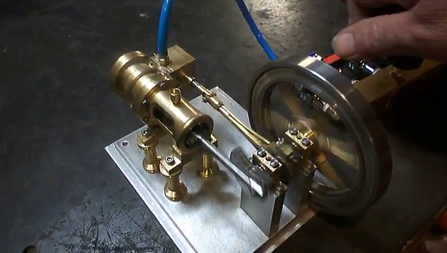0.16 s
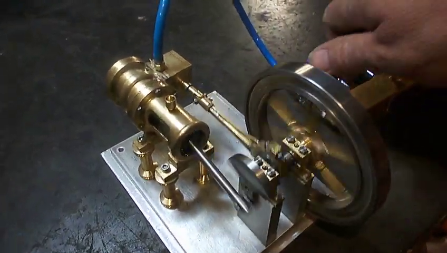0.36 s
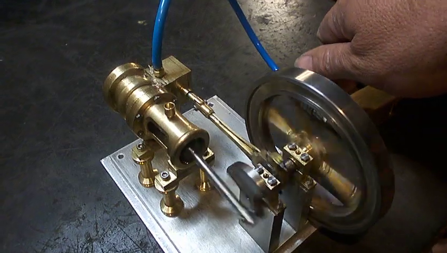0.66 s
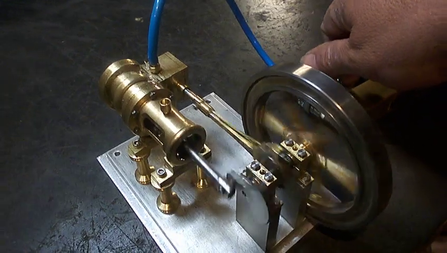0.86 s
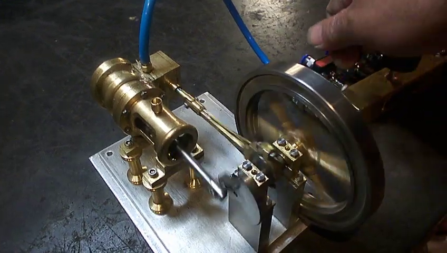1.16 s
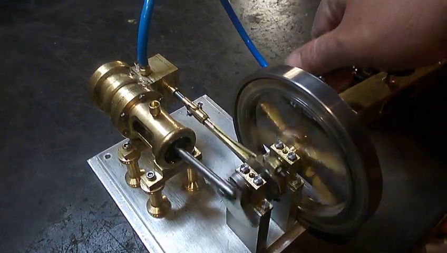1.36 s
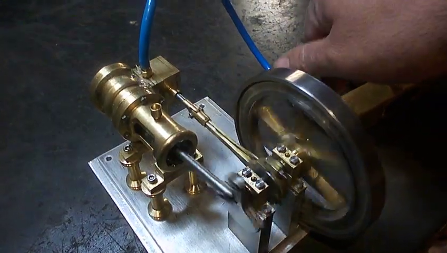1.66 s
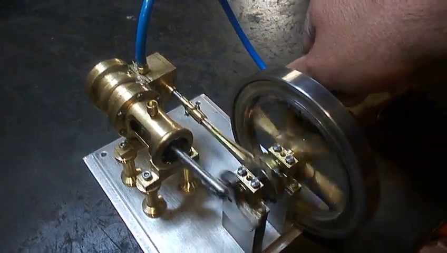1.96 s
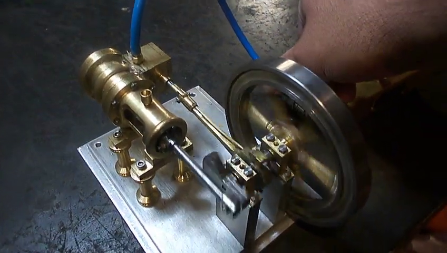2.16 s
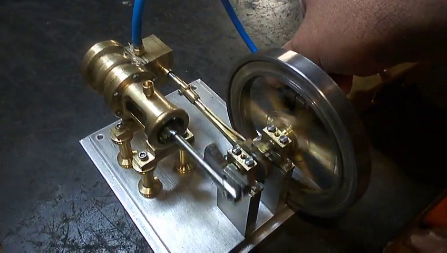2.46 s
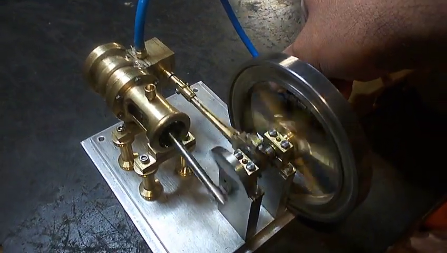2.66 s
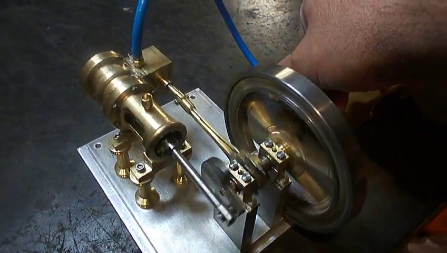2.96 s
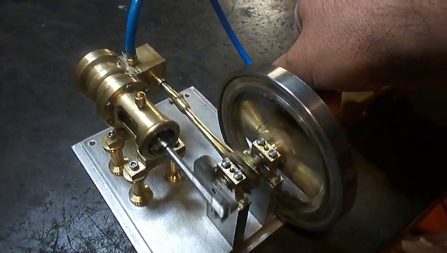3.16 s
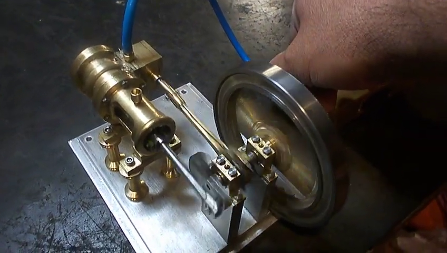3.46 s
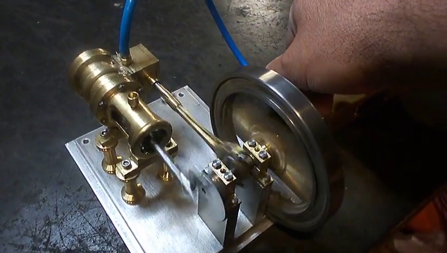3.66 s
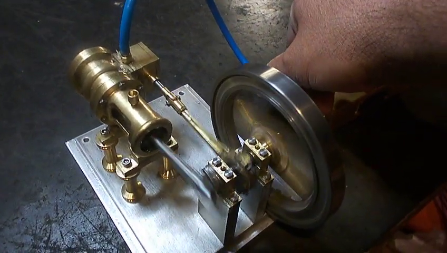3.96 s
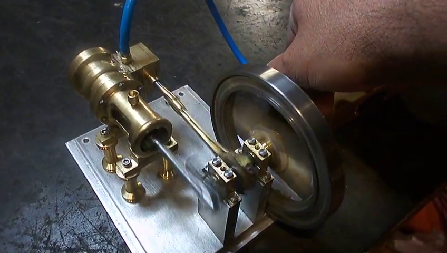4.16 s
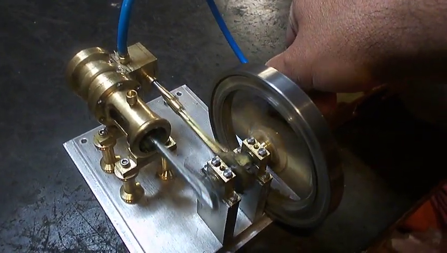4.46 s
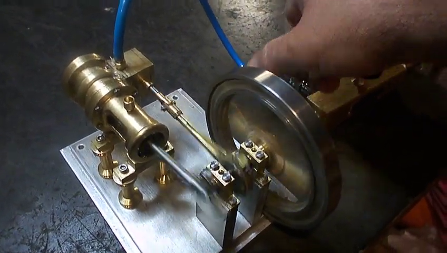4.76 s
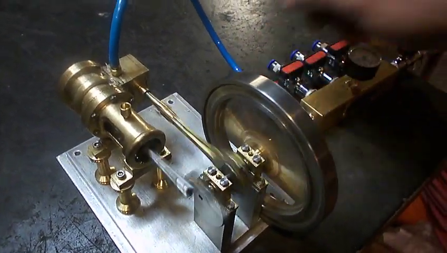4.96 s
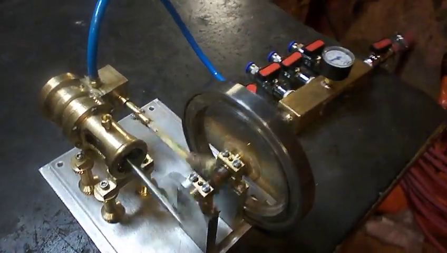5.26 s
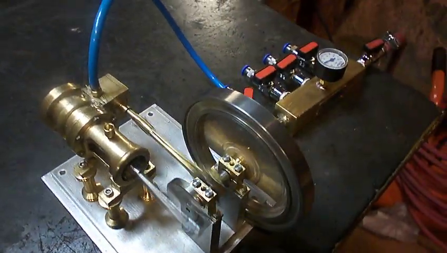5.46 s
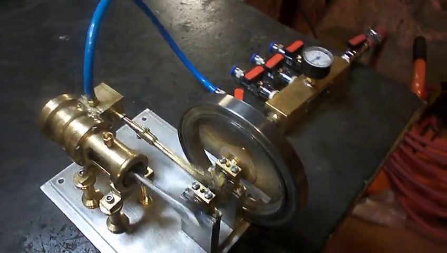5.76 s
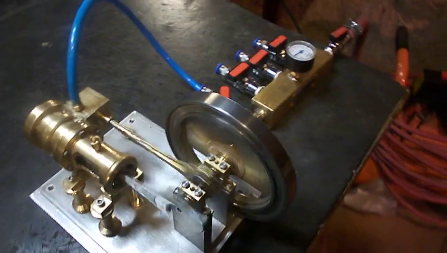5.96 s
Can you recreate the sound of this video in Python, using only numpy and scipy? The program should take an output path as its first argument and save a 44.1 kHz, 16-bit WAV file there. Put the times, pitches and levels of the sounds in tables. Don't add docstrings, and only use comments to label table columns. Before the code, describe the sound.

A small brass engine on a workshop bench, heard close and dry through a modest camera microphone with dull top end. From 0 s a bright, turbulent air leak hisses continuously, strongest in the upper mids. Over it come soft-edged exhaust puffs, two per turn, about seven a second, each slightly different, some whistling, with a faint hollow port ring. Until about 2.6 s a hand adds quiet, fuzzy, low gliding rubs on hose and tap. Around 2.8 to 3 s the hose gives a brief low moan as flow increases. The engine accelerates; the last distinct puffs fade by 3.6 s. From 3.5 s the hiss flutters with each turn, and a soft rod knock raps the plate once per turn, eight then ten a second. A low rattling shudder swells, settling after 5.4 s at about eleven turns a second, running steadily to the end.

```python
import sys
import numpy as np
from scipy import signal
from scipy.fft import rfft, irfft
from scipy.io import wavfile
from scipy.ndimage import uniform_filter1d

SR = 44100
rng = np.random.default_rng(int(sys.argv[2]) if len(sys.argv) > 2 else 0)


def invert_db(level):
    return 10 ** (np.asarray(level, dtype=float) / 20)


def log_audio(samples):
    frames = np.atleast_2d(samples).T
    limited = np.clip(frames, -1, 1)
    pcm = np.round(limited * 32767).astype(np.int16)
    wavfile.write(sys.argv[1], SR, pcm)


N = 269892
TIME = np.arange(N) / SR
IDLE, FULL = 3.4, 11.1


def evened(x):
    return x / np.sqrt(np.mean(x ** 2) + 1e-20)


def read(points, hz):
    f, value = np.transpose(points)
    return np.interp(np.log(hz + 1), np.log(f + 1), value)


def colour(x, points):
    return irfft(rfft(x) * invert_db(read(points, np.fft.rfftfreq(N, 1 / SR))), N)


def bell(hz, centre_hz, spread_hz):
    return np.exp(-.5 * ((hz - centre_hz) / spread_hz) ** 2)


def resonate(x, hz, width_hz):
    turn = np.exp(2j * np.pi * np.cumsum(hz * np.ones(len(x))) / SR)
    pole = np.exp(-np.pi * width_hz / SR)
    return 2 * (turn * signal.lfilter([1 - pole], [1, -pole], x / turn)).real


def resonate_twice(x, hz, width_hz):
    return resonate(resonate(x, hz, width_hz), hz, width_hz)


def ringing(air, modes):
    return sum((-1) ** k * invert_db(db) * evened(resonate_twice(air, hz, 1.3 * width_hz))
               for k, (hz, width_hz, db) in enumerate(modes))


def speed(t):
    # (time [s], speed [turns per s])
    speed_points = [(0, 3.473), (1.4, 3.512), (1.8, 3.383), (2.35, 3.367), (2.6, 3.9), (3.05, 4.893),
                    (3.5, 7.581), (3.85, 9.431), (4.5, 10.407), (5.4, 11.125), (6.2, 11.14)]
    return np.interp(t, *np.transpose(speed_points))


def crank(t):
    start_turn = .564
    steps_s = np.arange(7000) / 1000
    turns = start_turn + np.cumsum(speed(steps_s - .0005)) / 1000 - speed(0) / 1000
    return np.interp(t, steps_s, turns)


def from_angle(turns, angle):
    return (turns - angle + .5) % 1 - .5


def near(turns, angle, spread):
    return np.exp(-.5 * (from_angle(turns, angle) / spread) ** 2)


def leak(patchy_db=1.1, flicker_db=0.63):
    # (time [s], level [dB])
    pressure = [(0, -26.5), (.04, -28.5), (.12, -26), (.8, -26), (1.5, -27.5), (2.1, -27.5), (2.6, -26.5),
                (2.9, -25.5), (3.6, -25), (4.2, -26.5), (5.2, -26), (5.6, -27), (6.05, -25.5), (6.12, -27)]
    # (idling [dB], picking up [dB], full speed [dB])
    tilt_gains = [(0.76, 1.7, -1.7), (1.75, -2.8, -0.5), (-.6, -2, -3.5)]
    # (centre [Hz], spread [Hz])
    tilt_bands = [(4700, 500), (2000, 1200), (0, 300)]
    # crank angle [0-1], spread [turns], level [dB]
    shut_valve = (0.72, 0.068, -0.94)
    # (crank angle [0-1], spread [turns], centre [Hz], spread [Hz], level [dB])
    valve = [(0.3, 0.065, 5300, 360, 4.5), (.76, 0.055, 4650, 280, -6.5), (0.2, 0.18, 6100, 330, -3.5),
             (0.85, 0.081, 6500, 410, 3.5), (.76, 0.043, 7200, 800, -1.5), (0, 0.033, 3600, 280, 0),
             (.25, .03, 1400, 280, 4.5), (0.5, 0.088, 1900, 530, 1), (0, 0.029, 350, 150, 3),
             (0.8, 0.029, 1700, 360, -4), (.5, 0.064, 500, 210, 3), (0.6, 0.055, 160, 170, 0),
             (.14, 0.027, 210, 230, -4.5), (1, 0.093, 99, 110, -2)]
    # (frequency [Hz], density [dB per Hz])
    leak_colour = [(35, -59.5), (60, -43.5), (100, -29.5), (140, -8.5), (300, -12), (600, -14), (1100, -13),
                   (1700, -12.5), (2300, -7), (3350, -6), (4250, -0.5), (5500, 0), (7000, 0), (9000, -24)]
    # (centre [Hz], spread [Hz], level [dB])
    body = [(530, 29, 3.5), (733, 37, 2), (1076, 55, 3), (1300, 22, -1.5), (1704, 70, -3), (2400, 44, 2),
            (3040, 65, 2), (3720, 110, -0.5), (4466, 70, -3.5), (4470, 110, 2), (4970, 110, -2.5),
            (4975, 57, 3), (5680, 60, 1), (6610, 110, -1), (6690, 130, 1.5)]
    pick_up = 4.85

    frames, hz = N // 128 + 5, np.fft.rfftfreq(512, 1 / SR)[:, None]
    t = np.arange(frames) * 128 / SR
    real, imag, patches = rng.standard_normal((frames, 257, 3)).T
    patches = uniform_filter1d(patches, size=6, axis=0)
    patches = evened(uniform_filter1d(patches, size=10, axis=1))
    flicker = evened(uniform_filter1d(rng.standard_normal(frames), size=3))

    level_db = np.interp(t, *np.transpose(pressure))
    running = np.interp(speed(t), [IDLE, pick_up], [0, 1])
    angle, spread, shut_db = shut_valve
    field_db = level_db + patchy_db * patches + flicker_db * flicker
    field_db += (1 - running) * shut_db * near(crank(t), angle, spread)
    for gains_db, band in zip(tilt_gains, tilt_bands):
        field_db += np.interp(speed(t), [IDLE, pick_up, FULL], gains_db) * bell(hz, *band)
    for angle, spread, centre_hz, spread_hz, db in valve:
        field_db += running * db * near(crank(t), angle, spread) * bell(hz, centre_hz, spread_hz)

    hiss = signal.istft((real + 1j * imag) * invert_db(field_db), nperseg=512, noverlap=384)[1][:N]
    hiss = colour(hiss, leak_colour)
    hz = np.fft.rfftfreq(N, 1 / SR)
    tint_db = sum(db * bell(hz, centre_hz, spread_hz) for centre_hz, spread_hz, db in body)
    return evened(irfft(rfft(hiss) * invert_db(tint_db), N)) * np.sqrt(np.mean(invert_db(level_db) ** 2))


def exhaust(song_db=-4.5, song_width_hz=550):
    # (time [s], jet level [dB], jet song [Hz])
    puffs = [(.125, -33, 5830), (.246, -30.5, 5530), (.41, -33, 4700), (.559, -33.5, 4780),
             (.695, -30.5, 4780), (.839, -36, 4610), (.978, -33, 6300), (1.119, -32.5, 6800),
             (1.266, -27.5, 6260), (1.404, -29.5, 4900), (1.561, -31.5, 6650), (1.691, -27, 4510),
             (1.852, -27, 4670), (1.986, -25.5, 4700), (2.143, -28, 5600), (2.265, -29, 5530),
             (2.435, -29, 6380), (2.582, -30, 4760), (2.684, -25.5, 6600), (2.785, -37.5, 4740),
             (3.055, -29.5, 4970), (3.128, -30.5, 4650), (3.193, -29.5, 4620), (3.298, -34, 5000),
             (3.556, -30.5, 5660)]
    puff_turns = (0.14, .1)
    port_db = (-37.5, -40.5)
    # (frequency [Hz], width [Hz], level [dB])
    port = [(732, 50, -9.5), (1065, 116, -4), (1434, 66, -10), (2316, 63, -7.5), (3050, 150, -1.5)]
    # (frequency [Hz], density [dB per Hz])
    jet_colour = [(80, -60.5), (300, -32), (1500, -20), (2500, -0.5), (3700, -5), (4700, 3), (6400, 6.5),
                  (7000, 2), (8000, -4.5)]
    # (frequency [Hz], width [Hz], level [dB])
    nozzle = [(2194, 230, -24), (4710, 290, -9), (5260, 64, -20.5), (6730, 390, -9.5)]
    port_loss_db, fade_turns_per_s = -9.5, 0.73

    ring, jet = np.zeros((2, N))
    for s, jet_db, _ in puffs:
        back = round(2 * crank(s)) % 2
        length_s = puff_turns[back] / speed(s)
        faded = np.clip((speed(s) - IDLE) / fade_turns_per_s, 0, 1) ** 2
        ring_db = port_db[back] + port_loss_db * faded
        now = abs(TIME - s) < 6 * length_s
        late = (TIME[now] - s) / (length_s * np.where(TIME[now] < s, .7, 1.2))
        ring[now] += invert_db(ring_db) * np.exp(-1.2 * late ** 2)
        jet[now] += invert_db(jet_db) * np.exp(-.5 * late ** 2)

    air = rng.standard_normal((4, N))
    s, _, jet_hz = np.transpose(puffs)
    nearest = np.interp(TIME, s, np.arange(len(puffs))).round().astype(int)
    song = invert_db(song_db) * evened(resonate_twice(air[3], jet_hz[nearest], song_width_hz))
    jet_air = evened(colour(air[1], jet_colour)) + ringing(air[2], nozzle) + song
    return ring * ringing(air[0], port) + jet * jet_air


def knock(uneven_db=-0.5):
    # (speed [turns per s], blow [dB])
    blow_db = [(5, -61.5), (8, -37.5), (10.2, -39.5), (11.1, -46)]
    # (frequency [Hz], level [dB], t60 [s])
    plate = [(258, 0.5, 0.061), (433, -4.5, 0.031), (537, -0.5, 0.034), (720, -1, .05), (840, -7, 0.036)]
    knock_angle = .5

    blows = np.diff(np.floor(crank(TIME) - knock_angle), prepend=0) > 0
    size_db = np.interp(speed(TIME), *np.transpose(blow_db)) + uneven_db * rng.standard_normal(N)
    t = np.arange(4096) / SR
    rap = sum(invert_db(db - 60 * t / t60) * np.sin(2 * np.pi * hz * t) for hz, db, t60 in plate)
    soft_start = np.minimum(t / .003, 1)
    return signal.oaconvolve(invert_db(size_db) * blows, rap * soft_start)[:N]


def shudder():
    orders = [(25.4, .41, .11), (20, .6, .13), (15.5, .02, .1), (7.7, 0, .11), (26, .95, .06),
              (46, .3, .08), (62, .53, .04), (12, .64, .08), (39, .56, .05), (21, .15, .06), (32, .5, .04)]
    orders_db = [0, 0, -6, -14.5, -5, -4, -3.5, -12.5, -5, -6, -5]
    # (level at full speed [dB], loss below it [dB per turn per s])
    growth = [(-44.5, 11), (-46.5, 3.5)]
    pair_floor = (-47, 3.8)

    turns, slack = crank(TIME), FULL - speed(TIME)
    count = int(turns[-1]) + 2
    wobble_db = .6 * rng.standard_normal((count, len(orders)))
    main_db, rest_db, floor_db = (db - loss_db * slack for db, loss_db in [*growth, pair_floor])
    bursts = np.zeros(N)
    for k, ((order, angle, spread), db) in enumerate(zip(orders, orders_db)):
        level_db = np.maximum(main_db, floor_db) if k < 2 else rest_db
        size = invert_db(db + level_db + np.interp(turns, np.arange(count), wobble_db[:, k]))
        wave = np.cos(2 * np.pi * order * from_angle(turns, angle))
        bursts += size * near(turns, angle, spread) * wave
    rumble = resonate_twice(rng.standard_normal(N), 95, 40)
    return 2 * bursts + invert_db(-70 - 2.0 * slack) * evened(rumble)


def hand():
    # (start [s], length [s], level [dB], start pitch [Hz], end pitch [Hz])
    rubs = [(.06, 0.34, -47.5, 376, 294), (0.461, 0.28, -45, 372, 490), (0.757, .14, -47.5, 400, 450),
            (.95, 0.28, -49.5, 326, 316), (1.2, 0.266, -45.5, 316, 277), (1.58, 0.15, -50.5, 280, 300),
            (1.966, 0.043, -47.5, 320, 320), (2.154, .16, -51, 350, 360), (2.52, 0.12, -52, 320, 350),
            (3.104, .18, -55, 260, 270)]
    # (start [s], length [s], start pitch [Hz], end pitch [Hz], level [dB])
    moans = [(2.855, .14, 206, 198, -42.5), (2.77, .2, 100, 115, -54), (2.81, .07, 230, 150, -46),
             (2.97, .12, 200, 240, -50), (.46, .1, 385, 375, -45), (1.27, .1, 310, 240, -46)]
    rub_width_hz = 106

    skin, out = rng.standard_normal(N), np.zeros(N)
    for start, length, db, hz0, hz1 in rubs:
        now = (TIME > start) & (TIME < start + length)
        u = (TIME[now] - start) / length
        fuzz = resonate_twice(skin[now], hz0 + (hz1 - hz0) * u, rub_width_hz)
        out[now] += invert_db(db) * np.sqrt(np.sin(np.pi * u)) * evened(fuzz)
    for start, length, hz0, hz1, db in moans:
        u = np.clip((TIME - start) / length, 0, 1)
        swell = np.sqrt(abs(np.sin(np.pi * u))) * (u < 1)
        cycles = length * (hz0 * u + .5 * (hz1 - hz0) * u ** 2)
        out += invert_db(db) * swell * np.sin(2 * np.pi * cycles)
    return out


def scene():
    return (leak() + exhaust() + knock() + shudder() + hand())[None]


def top_cut(x):
    return signal.sosfilt(signal.butter(12, 9080, fs=SR, output="sos"), x)


def record(dry):
    # (frequency [Hz], gain [dB])
    converter = [(7000, 0), (7250, -1.5), (7500, -2), (7750, -12), (8000, -24.5)]
    notch_hz = [3935, 5220, 5905, 7865]
    # (width [Hz], depth [dB])
    notches = [(27, -20), (25, -17.5), (23, -9), (70, -17.5)]
    # (frequency [Hz], gain [dB])
    image = [(7600, 0), (8000, 3), (8500, -15), (9000, -35), (9300, -47.5)]
    camera_hz = 16000

    hz = np.fft.rfftfreq(N, 1 / SR)
    z = rfft(dry[0]) * invert_db(read(converter, hz)) * (hz < camera_hz / 2)
    for centre_hz, (width_hz, db) in zip(notch_hz, notches):
        off = ((hz - centre_hz) / width_hz) ** 2
        z = z * np.sqrt((off + invert_db(db) ** 2) / (off + 1))
    mirror = np.clip(camera_hz * N // SR - np.arange(len(hz)), 0, len(hz) - 1)
    z = (z + np.conj(z[mirror])) * invert_db(read(image, hz))
    mix = irfft(z, N)[None]
    return top_cut(mix)


dry = scene()
out = record(dry)
log_audio(out)
```